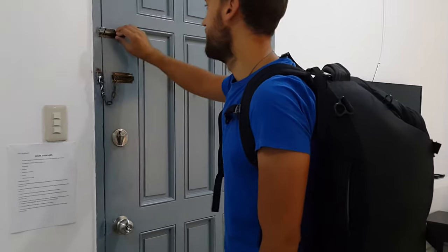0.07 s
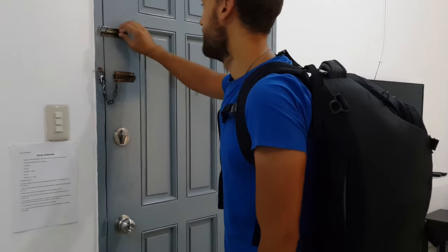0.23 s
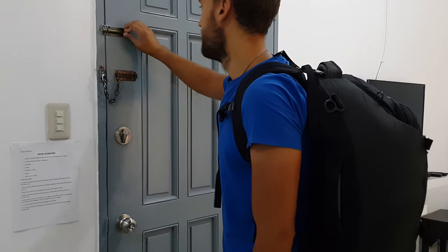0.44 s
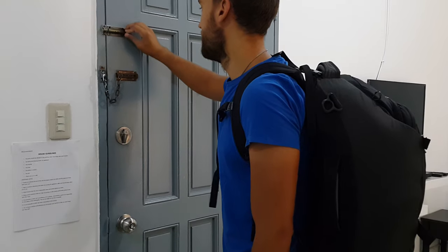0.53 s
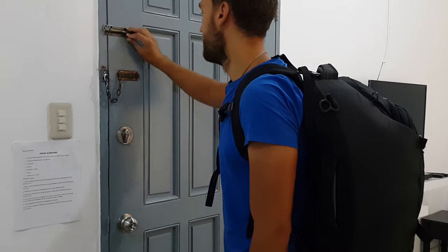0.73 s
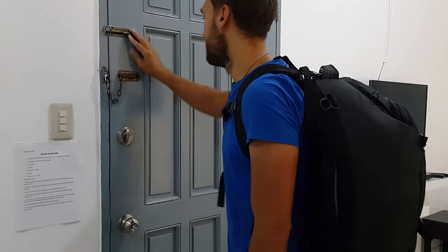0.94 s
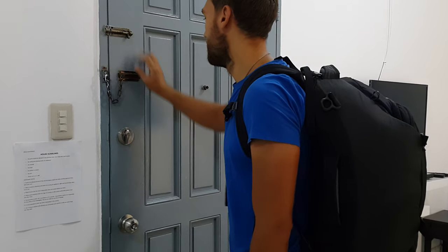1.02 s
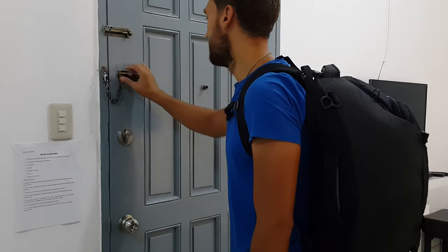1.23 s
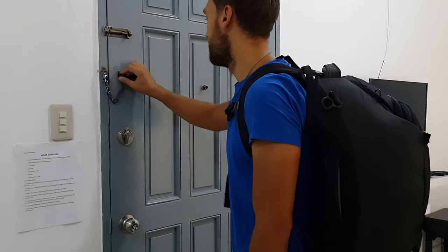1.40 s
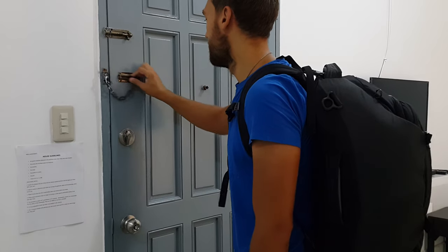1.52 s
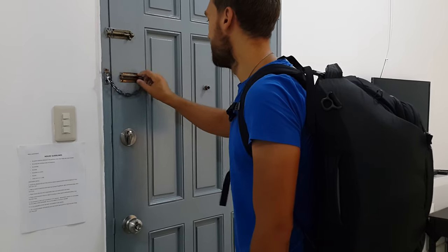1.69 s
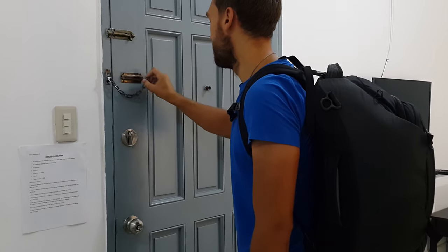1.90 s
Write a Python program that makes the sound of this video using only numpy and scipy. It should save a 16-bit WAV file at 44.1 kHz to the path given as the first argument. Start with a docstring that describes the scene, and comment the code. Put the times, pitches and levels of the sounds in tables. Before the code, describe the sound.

A metal door bolt clacks, bangs back against its stop with a boom of the door, and rattles as it drops. A door chain's pin then clicks, scrapes along its track and knocks, in a bare, echoing room.

```python
"""In a bare, echoing room, two metal bolts on a panelled door are drawn: a barrel bolt and, below it,
the sliding pin of a door chain. The upper bolt clacks up, bangs back against its stop and is let drop.
The lower one clicks, scrapes along its track and knocks against the end. Each blow is a steel tick,
a ring of the bolt and a boom of the door. A low hum lies underneath, and the right microphone is
shaded, so it sounds dull."""
import sys
import numpy as np
from scipy import signal
from scipy.fft import rfft, irfft
from scipy.io import wavfile
from scipy.ndimage import uniform_filter1d

SR = 44100
rng = np.random.default_rng(int(sys.argv[2]) if len(sys.argv) > 2 else 0)


def persist_wave(psi):
    """Save psi, clipped to +-1, as 16-bit WAV."""
    counts = np.round(np.clip(psi, -1, 1) * 32767).astype(np.int16)
    wavfile.write(sys.argv[1], SR, np.atleast_2d(counts).T)


N = 85995
T = np.arange(N) / SR
HZ = np.fft.rfftfreq(8192, 1 / SR)

# Tone of the steady rumble and hiss: pitch_hz, level_db
AIR_TONE = [(20, -31), (38, -25), (54, 3.5), (70, -7.5), (95, -9), (135, 3), (180, -9.5), (220, -3),
            (400, -12.5), (1000, -20), (2500, -28.5), (5000, -38.5), (8000, -42), (15500, -40)]
# How the hum rises and falls: time_s, level_db
HUM_LEVELS = [(0, -46), (.27, -45), (.4, -47.5), (.8, -42.5), (1.15, -50), (1.38, -65.5), (1.6, -50),
              (1.75, -46.5), (1.95, -55.5)]
# How alike left and right are (1 = the same): pitch_hz, likeness
STEREO_LIKENESS = [(50, 1), (150, 0.92), (300, 0.99), (600, 0.71), (1200, 0.34), (4000, 0.013)]
# What the shaded right microphone loses: pitch_hz, gain_db
RIGHT_SHADE = [(60, -8), (300, -3.5), (1200, -4), (2400, -5), (4000, -7.5), (6000, -17.5), (8000, -27),
               (10000, -18.5), (15000, -8)]
# How long the room's echo takes to fade by 60 dB: pitch_hz, fade_s
ROOM_FADE = [(100, 1.26), (300, 1.2), (700, 1.034), (1500, 0.88), (3000, 0.91), (6000, 0.79), (9000, 0.56),
             (15000, 0.42)]
# The door's longest notes: pitch_hz, level_db, fade_s
DOOR_NOTES = [(499.6, -27.5, 0.94), (905, -34, 1.5), (1005, -28, 0.77), (1052, -33, 0.61),
              (1263, -22, 0.97), (1338, -28, 0.58), (1499, -36, 0.56), (1468, -31.5, 1.2)]
# Tone of the door's boom, the steel tick and the sliding rasp: pitch_hz, level_db
BOOM_TONE = [(40, -57), (110, -23.5), (215, -4), (330, -5.5), (600, 0), (950, 3.5), (1350, 2), (2000, -2),
             (3000, -8.5), (4500, -16), (5700, -12.5), (7000, -43), (15000, -87)]
TICK_TONE = [(200, -37), (1000, -6), (2500, 4), (4500, -3.5), (6000, -0.5), (7500, -3.5), (11000, -2.5),
             (15500, -7)]
RASP_TONE = [(150, -18), (500, -14), (1200, -4), (2200, 1.5), (3300, -2), (4500, -6), (5750, -4.5),
             (6800, -14.5), (10000, -21.5), (15000, -31)]
# A faint room echo dying away at the start (first row), then slides along the barrel or track:
# start_s, length_s, rasp_db, ring_db
ECHO_AND_SLIDES = [(0, 0.029, -57.5, -61), (0.147, 0.027, -46.5, -68), (0.723, 0.043, -57, -48),
                   (1.532, 0.17, -40, -42.5), (1.812, 0.14, -55, -64)]
# Where the track and the bolts ring, shut or drawn back: pitch_hz, width_hz, level_db
TRACK_RING = [(1476, 23, 0.5), (1710, 92, -6), (2050, 84, -6.5), (2620, 37, -5)]
UPPER_SHUT_RING = [(305, 160, -4), (694, 103, 0.5), (940, 72, 2), (1328, 110, 6.5), (1590, 190, -3.5),
                   (2620, 75, 5.5), (2736, 41, 4.5), (3330, 920, -11), (5700, 390, -11), (7500, 320, -16)]
LOWER_SHUT_RING = [(614, 13, 3), (818, 33, -4), (1560, 90, -3.5), (2170, 89, -9.5), (2920, 190, 1),
                   (3410, 68, -0.5), (4050, 130, -7), (4650, 100, -7.5), (5520, 220, -11.5),
                   (8000, 400, -18.5)]
LOWER_DRAWN_RING = [(810, 36, -12), (1170, 260, 4.5), (1510, 150, 0), (1800, 200, 1), (2200, 200, 1),
                    (3360, 860, -8), (4260, 710, 0), (5830, 650, -1), (7900, 570, -8)]
# A low hum of the room that swells with the upper bolt's blows (first row), then where that bolt
# rings when drawn back: pitch_hz, width_hz, level_db
HUM_AND_UPPER_DRAWN_RING = [(147.8, 7.2, 4), (316, 23, 5.5), (432, 28, 1.5), (856, 63, 2), (1240, 48, 6.5),
                            (1620, 130, -9), (1916, 223, 5), (2050, 65, -5), (3300, 510, -7.5),
                            (5700, 320, -11.5)]
# Knocks that make the bolt ping: start_s, level_db
PING_KNOCKS = [(0.2146, -26), (0.4239, -13.5)]
# Blows of each bolt, where some rows are a sharp echo of an earlier blow returning some 12 to 17 ms later #
# (the rows at 0.4366, 0.441, 0.778, 1.4395 and 1.796 s): start_s, boom_db, ring_db, tick_db, #
# tick_tilt_db_per_octave, drawn_back (0 to 1)
UPPER_BOLT_BLOWS = [(0.158, -14, -39, -35, 6, 1), (.2154, -23, 4.5, -6.5, 0, 0.04),
                    (0.4208, -1.5, 3, -8, 1.5, 1), (0.4242, 14, 4.5, 2.5, 3, 0.8),
                    (0.4366, 12, 3, -7.5, 1.5, 0.5), (0.4410, 7.5, -2.5, -11, 9.5, 0.4),
                    (.661, -26, -26, -19, 2, 0.7), (0.7431, -3, -4.5, -27, -6, 0.83),
                    (0.7609, -11, -9, -14, 4.5, 0.75), (.7625, -1.5, 6.5, -8.5, -0.5, 1),
                    (.778, -9, -1, -18, 7, 0.53), (1.1012, -43, -46, -34, 12.5, 0.8)]
LOWER_BOLT_BLOWS = [(1.4253, -18.5, -4, -14, 1, 0), (1.4395, -10, -5, -22, -5, 0.06),
                    (1.7788, -26, -6.5, -8.5, -.5, 1), (1.7812, -24, -14, -24, 13, 0.7),
                    (1.7868, -32, -20, -16, -0.5, 1), (1.7960, -12, -11.5, -26, -8, 0.74),
                    (1.8538, -20, -8, -15, 2, 0.6)]


def amp(db):
    """Turns decibels into a number to multiply by."""
    return 10 ** (np.asarray(db) / 20)


def unit(x):
    """Scales a sound so that its energy is 1."""
    return x / np.sqrt(np.sum(x ** 2) + 1e-20)


def read(table, hz):
    """Looks up a pitch in a table, gliding between the rows."""
    pitches, values = np.transpose(table)
    return np.interp(np.log(hz + 1), np.log(pitches + 1), values)


def add(mix, start_s, sound):
    """Adds a sound to the mix at its start time."""
    part = mix[:, max(round(start_s * SR), 0):][:, :sound.shape[1]]
    part += sound[:, :part.shape[1]]


def peaks(table):
    """A tone curve with a steep peak at each listed pitch."""
    return np.sqrt(sum(amp(db) ** 2 / (1 + ((HZ - hz) / width) ** 2) ** 1.5 for hz, width, db in table))


def tap_sound(tone):
    """The sound of one sharp tap on an object with this tone curve."""
    log_tone = np.log(np.maximum(tone, 1e-5))
    mirrored = np.concatenate([log_tone, log_tone[-2:0:-1]])
    spectrum = np.exp(np.conj(signal.hilbert(mirrored)))  # nothing sounds before the tap
    return unit(np.fft.ifft(spectrum).real[:len(HZ)])


def noise_pair(tone=lambda hz: 1):
    """Noise from all around reaches two microphones, most alike in the bass."""
    hz = np.fft.rfftfreq(N, 1 / SR)
    left, other = rfft(rng.standard_normal((2, N)))
    likeness = read(STEREO_LIKENESS, hz)
    right = likeness * left + np.sqrt(1 - likeness ** 2) * other
    pair = irfft(np.array([left, right]) * tone(hz), N)
    return pair / pair[0].std()


def background(air_db=-46, hum_hz=144.2, hum_width_hz=22.7, right_db=-4.5):
    """Low rumble, faint hiss and a wavering hum."""
    air = amp(air_db) * noise_pair(lambda hz: amp(read(AIR_TONE, hz)))
    hum = noise_pair(lambda hz: np.exp(-((hz - hum_hz) / hum_width_hz) ** 2))
    hum *= amp(np.interp(T, *np.transpose(HUM_LEVELS)))
    return (air + hum) * amp([[0], [right_db]])


def even_out(echo, width_hz=70):
    """Smooths the chance peaks and dips in an echo's tone."""
    spectrum = rfft(echo)
    power = (abs(spectrum) ** 2).mean(0)
    bins = int(width_hz * N / SR)
    gain = np.sqrt(uniform_filter1d(power, 10 * bins) / uniform_filter1d(power, bins))
    return irfft(spectrum * gain, N) * (T < T[-1] - 0.2)


def in_room(sound, direct_db, gap_s=0.0011, build_s=0.0044):
    """The sound arrives directly, then as a dense echo whose treble dies first."""
    hz, t, spectra = signal.stft(noise_pair(), SR, nperseg=256)
    fade = amp(-60 * t / read(ROOM_FADE, hz)[:, None])
    echo = signal.istft(spectra * fade, SR, nperseg=256)[1][:, :N]
    echo *= 1 + amp(-4) * np.exp(-T / 0.1)  # the first bounces are stronger
    echo = even_out(echo) * np.clip((T - gap_s) / build_s, 0, 1)
    echo /= np.linalg.norm(echo[0])
    echo[:, 0] += amp(direct_db)
    return signal.fftconvolve(sound[None], echo, axes=1)[:, :N]


def door_notes(bang_s=0.428, build_s=0.0044, gain_db=-1):
    """The bang leaves the door's longest notes hanging in the room."""
    out = np.zeros((2, N))
    for hz, db, fade_s in DOOR_NOTES:
        loudness = amp(gain_db + db - 60 * T / fade_s) * (1 - np.exp(-T / build_s))
        # Higher notes can be further out of step between left and right.
        phase = rng.random() + rng.uniform(-0.43, 0.72, (2, 1)) * (1 - read(STEREO_LIKENESS, hz))
        add(out, bang_s, loudness * np.cos(2 * np.pi * (hz * T + phase)))
    return out


def echo_and_slides(slips_per_s=1800):
    """A faint echo dies away; later a pulled bolt makes tiny slips that rasp, then ring the track."""
    rubbing = np.zeros((2, N))  # one row for the rasp, one for the ring
    for start_s, length_s, rasp_db, ring_db in ECHO_AND_SLIDES:
        progress = T[T < length_s] / length_s
        chance, size, side = rng.random((3, N))[:, :len(progress)]
        strength = amp(-2 * np.log(size + 0.026))
        slips = (chance < slips_per_s / SR) * strength * np.sign(side - 0.5)
        slips = np.sqrt(len(slips)) * unit(slips)
        swells = np.sin(np.pi * np.array([progress ** 0.57, progress ** 2.3])) ** 0.55  # early, late
        add(rubbing, start_s, amp([[rasp_db], [ring_db]]) * slips * swells)
    taps = np.array([tap_sound(amp(read(RASP_TONE, HZ))), tap_sound(peaks(TRACK_RING))])
    sound = signal.fftconvolve(rubbing, taps, axes=1).sum(0)[:N]
    return in_room(sound, direct_db=-5.5)


def pings(pitches_hz=(2610, 2790), fade_s=0.16):
    """A hard knock makes the steel bolt ping: two close notes that beat and die quickly."""
    out = np.zeros((2, N))
    notes = np.mean([np.sin(2 * np.pi * hz * T) for hz in pitches_hz], 0)
    for start_s, db in PING_KNOCKS:
        ping = notes * amp(db - 60 * T / fade_s)
        add(out, start_s, ping[None])
    return out


def chatter(decay_s, samples=2048):
    """Metal meets metal in a short burst of tiny contacts."""
    fade = np.exp(-T[:samples] / decay_s)
    burst = rng.standard_normal(samples) * fade
    for _ in range(4):  # make all pitches equally strong while keeping the burst short
        spectrum = rfft(burst * np.sqrt(fade))
        burst = irfft(spectrum / (abs(spectrum) + 1e-12))
    return unit(burst * (T[:samples] < T[samples // 2]))


def steel_tick(level_db, tilt_db_per_octave, top_hz=11800):
    """Steel ticks as it is struck; harder ticks reach higher."""
    tone = amp(read(TICK_TONE, HZ) + tilt_db_per_octave * np.log2((HZ + 1) / top_hz))
    cutoff_hz = top_hz * amp(0.38 * level_db)
    return amp(level_db) * tap_sound(tone / np.sqrt(1 + (HZ / cutoff_hz) ** 6))


def blend(sounds):
    """Sounds that spread from different spots add their powers in the room."""
    power = sum(abs(rfft(sound, 2 * len(HZ) - 2)) ** 2 for sound in sounds)
    return np.linalg.norm(sounds) * tap_sound(np.sqrt(power / power.max()))


def bolt(blows, shut_peaks, drawn_peaks):
    """Each blow booms the door, rings the bolt and ticks; the ring changes as the bolt is drawn back."""
    out = np.zeros((2, N))
    door = tap_sound(amp(read(BOOM_TONE, HZ)))
    shut_power, drawn_power = unit(peaks(shut_peaks)) ** 2, unit(peaks(drawn_peaks)) ** 2
    for start_s, boom_db, ring_db, tick_db, tilt, drawn_back in blows:
        notes = tap_sound(np.sqrt((1 - drawn_back) * shut_power + drawn_back * drawn_power))
        boom = signal.fftconvolve(chatter(decay_s=0.0064), amp(boom_db) * door)
        ring = signal.fftconvolve(chatter(decay_s=0.00274), amp(ring_db) * notes)
        tick = signal.fftconvolve(chatter(decay_s=0.0034), steel_tick(tick_db, tilt))
        echo = in_room(blend([boom, ring, tick]), direct_db=-np.inf)
        # Light ticks barely stir the room, so more of their sound arrives directly.
        direct = amp(-8.5) * (boom + ring) + amp(-2.5 - 0.21 * tick_db) * tick
        add(out, start_s, echo)
        add(out, start_s, direct[None])
    return out


def scene(right_delay_s=0.00023):
    """The door is to the left: the right microphone hears it later and duller."""
    upper = bolt(UPPER_BOLT_BLOWS, UPPER_SHUT_RING, HUM_AND_UPPER_DRAWN_RING)
    lower = bolt(LOWER_BOLT_BLOWS, LOWER_SHUT_RING, LOWER_DRAWN_RING)
    left, right = upper + lower + pings() + door_notes() + echo_and_slides()
    hz = np.fft.rfftfreq(2 * N, 1 / SR)
    shade = amp(read(RIGHT_SHADE, hz))
    delay = np.exp(-2j * np.pi * hz * right_delay_s)
    right = irfft(rfft(right, 2 * N) * shade * delay)[:N]
    return np.array([left, right]) + background()


def record(dry):
    """Cuts away the very highest treble, above 15900 Hz."""
    low_pass = signal.firwin(511, 15900, window=("kaiser", 9), fs=SR)
    return signal.oaconvolve(dry, low_pass[None], "same")


dry = scene()
out = record(dry)
persist_wave(out)
```